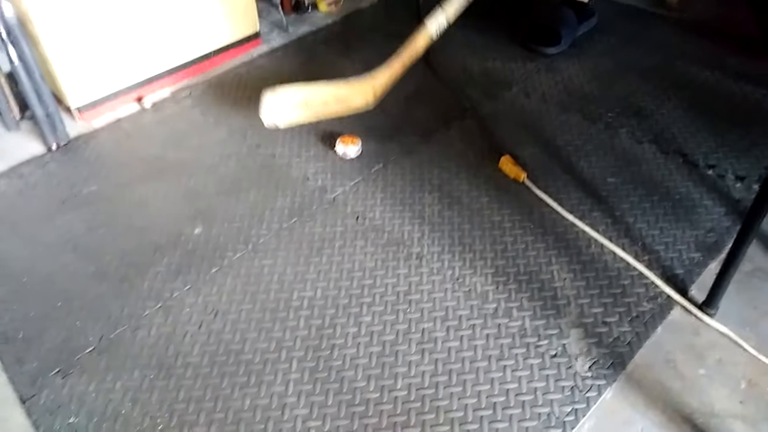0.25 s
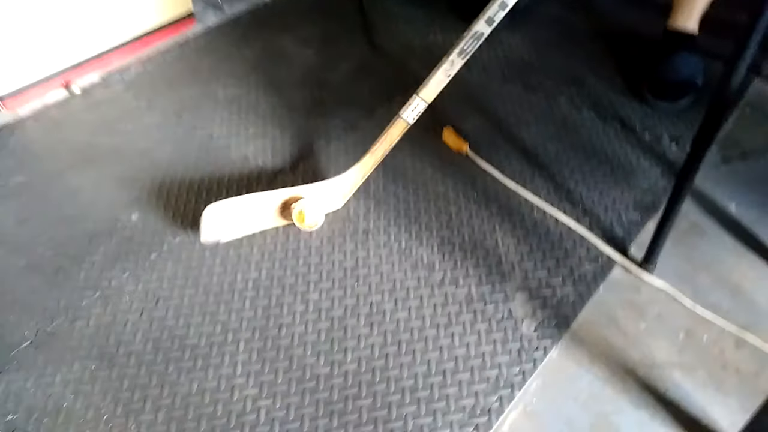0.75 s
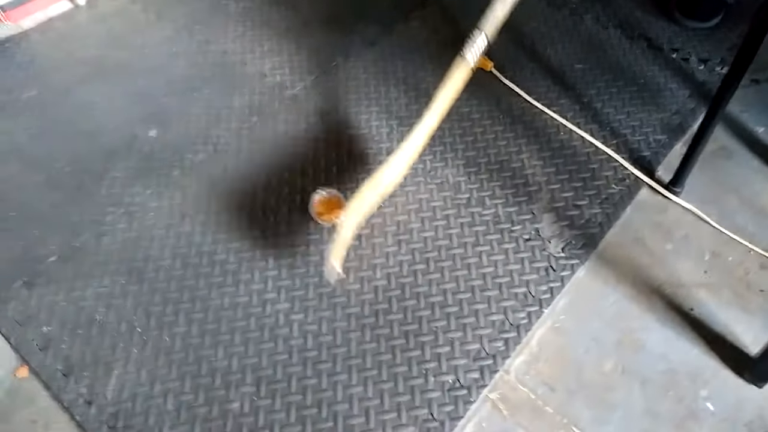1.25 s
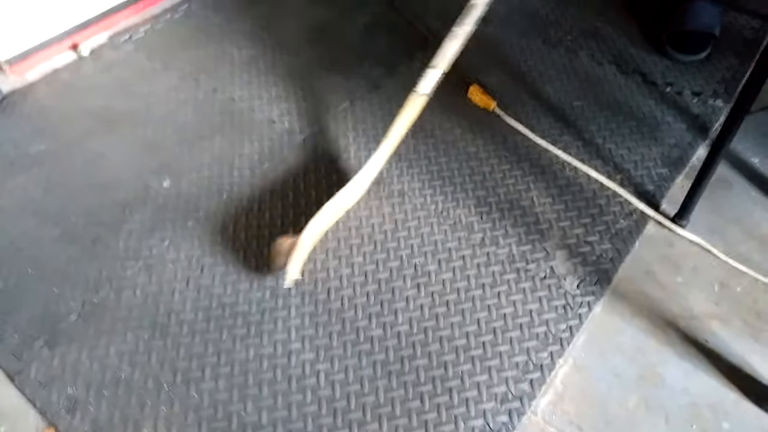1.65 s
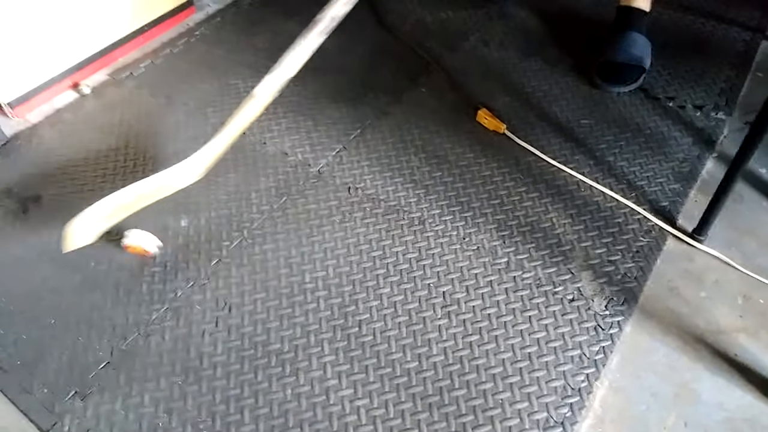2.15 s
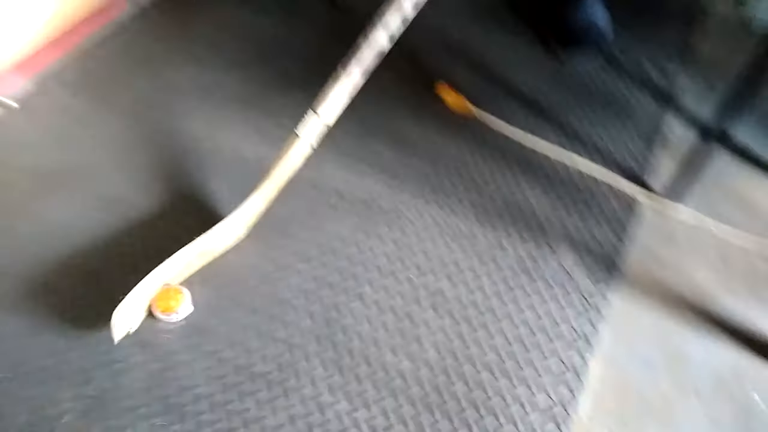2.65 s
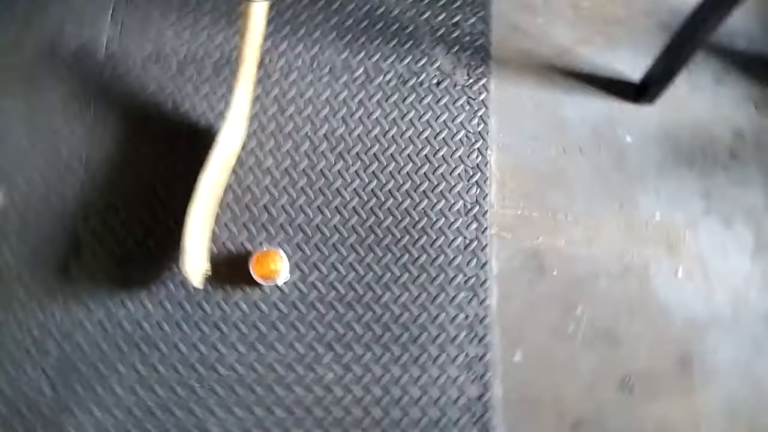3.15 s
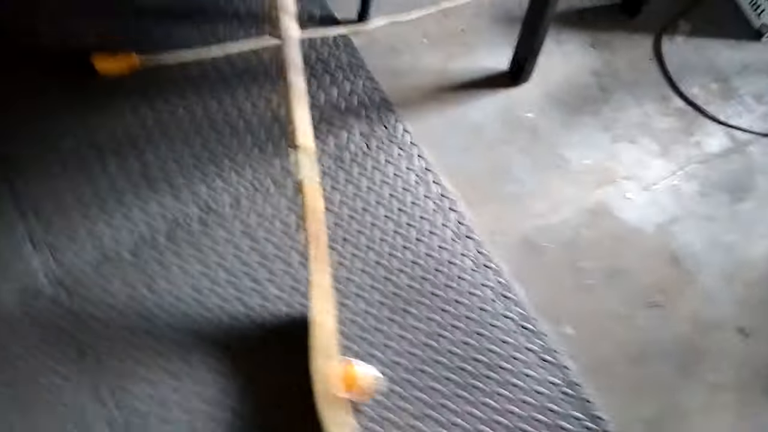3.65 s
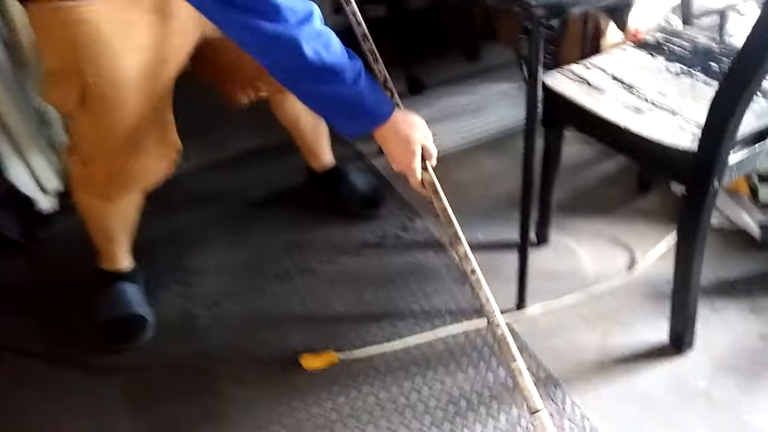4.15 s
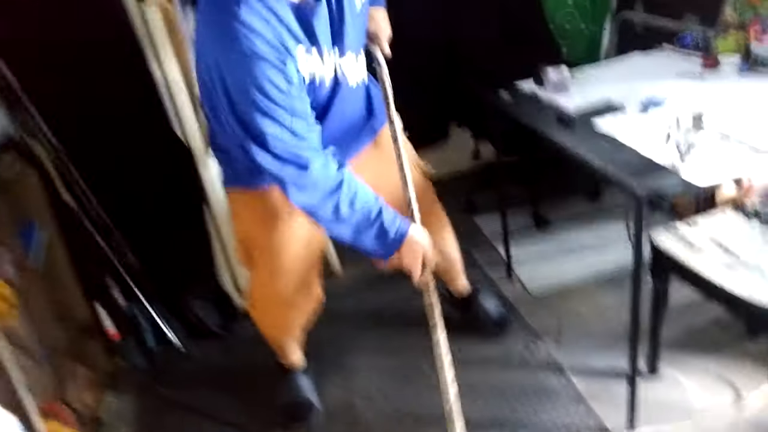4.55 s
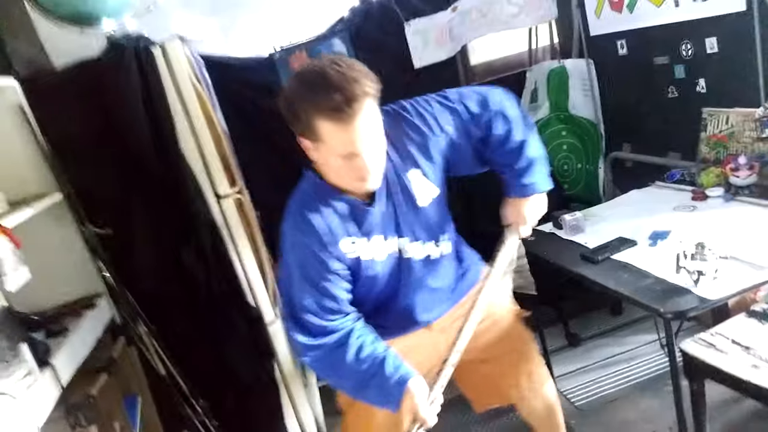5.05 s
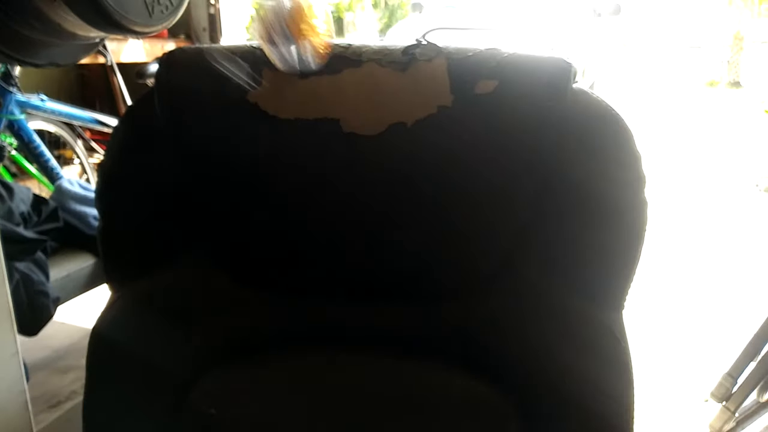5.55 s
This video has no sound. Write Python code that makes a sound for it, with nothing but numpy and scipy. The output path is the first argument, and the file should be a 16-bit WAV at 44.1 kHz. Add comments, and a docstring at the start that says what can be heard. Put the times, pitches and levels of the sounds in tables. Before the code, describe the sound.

A wooden hockey stick clacks a hard ball and scrapes over a rubber mat in a garage, then a shot crashes loudly into clutter.

```python
"""A wooden hockey stick taps a hard ball to and fro on a rubber mat in a garage: the wood clacks and
the ball rings on. Between taps the blade knocks on the mat, rasps over the tread and judders.
The player steps up with soft footfalls and shoots; stick and ball crash into stored clutter, loud
enough to drive the recorder's limiter. Short garage reflections and faint room tone surround it all."""
import sys
import numpy as np
from scipy import signal
from scipy.io import wavfile
from scipy.ndimage import uniform_filter1d, minimum_filter1d

SR = 44100
rng = np.random.default_rng(int(sys.argv[2]) if len(sys.argv) > 2 else 0)


def put_to_file(sound):
    """Save the sound as 16-bit audio at rate SR, in the file named by the first command-line argument."""
    columns = np.atleast_2d(sound).T  # one column per channel
    safe = np.clip(columns, -1, 1)
    whole_steps = np.round(safe * 32767)
    wavfile.write(sys.argv[1], SR, whole_steps.astype(np.int16))


N = 255780
TIME = np.arange(N) / SR
BODY_TOP_HZ, CLACK_TOP_HZ = 800, 3400   # crossovers of a blow: low body, mid clack, high crack

# broad resonances of the wooden stick: (frequency [Hz], width [Hz], level [dB])
STICK_MODES = [(394, 31, -34.5), (675, 126, -19), (880, 150, -3), (1072, 65, -0.5), (1460, 52, -18),
               (1490, 143, 0), (1850, 260, 0.5), (2050, 170, -2.5), (2400, 500, 4.5), (2875, 290, 3.5),
               (3130, 86, -1.5), (3970, 460, 3), (4470, 173, 3.5), (5200, 3000, -29), (5620, 2400, 5),
               (7700, 1700, -0.5), (7600, 1200, -63), (8800, 3600, -3)]


def from_db(db):
    """Decibels to gain."""
    return 10 ** (np.asarray(db) / 20)


def rms_one(x):
    """Scale to rms 1."""
    return x / np.sqrt(np.mean(x ** 2) + 1e-20)


def unit_energy(x):
    """Scale to a sum of squares of 1."""
    return x / np.sqrt(np.sum(x ** 2) + 1e-20)


def in_time(curve):
    """Read a breakpoint curve at every sample."""
    return np.interp(TIME, *np.transpose(curve))


def at_hz(spectrum, hz):
    """Read an EQ curve on a log-frequency axis."""
    points_hz, db = np.transpose(spectrum)
    return np.interp(np.log(hz), np.log(points_hz), db)


def cut(x, hz, kind, order=2):
    """Butterworth filter."""
    return signal.sosfilt(signal.butter(order, np.minimum(hz, .48 * SR), kind, fs=SR, output="sos"), x)


def bands(sources):
    """Yield third-octave bands (centre [Hz], signal); neighbours take turns on two sources."""
    edges = 100 * 2 ** (np.arange(23) / 3)
    for k, (lo, hi) in enumerate(zip(edges, edges[1:])):
        yield np.sqrt(lo * hi), cut(sources[k % 2], [lo, hi], "band")


def drift(knots_per_s):
    """Random modulation that glides between values of spread 1."""
    knots = rng.standard_normal(600)
    return np.interp(TIME * knots_per_s, np.arange(len(knots)), knots)


def add(track, s, sound):
    """Mix a sound in at a time."""
    i = int(np.clip(round(s * SR), 0, len(track) - 1))
    track[i:i + len(sound)] += sound[:len(track) - i]


def garage(x, wet_db, t60_s=0.26, treble_t60_s=0.18):
    """Dense reflections build up fast and die away; each spot in the room has its own pattern."""
    t = TIME[:SR // 3]
    noise = rng.standard_normal(len(t))
    dull = cut(noise, 6900, "low", order=1)
    tail = dull * from_db(-60 * t / t60_s) + (noise - dull) * from_db(-60 * t / treble_t60_s)
    build_up = 1 - np.exp(-t / 0.00011)
    response = from_db(wet_db) * unit_energy(tail * build_up)
    response[0] += 1   # direct sound
    return signal.fftconvolve(x, response)[:N]


def blow(modes, levels_db, clack_hz, scatter_db, focus_db):
    """A contact rings all modes: hardness sets body, clack and crack; its place favours one pitch."""
    hz, width, db = np.transpose(modes)
    group = np.searchsorted([BODY_TOP_HZ, CLACK_TOP_HZ], hz)
    off_pitch_db = focus_db * (group == 1) * np.abs(np.log2(hz / clack_hz))
    gain = from_db(db - off_pitch_db + scatter_db * rng.standard_normal(len(hz)))
    t = TIME[:SR // 20, None]
    decay = np.sqrt(width) * np.exp(-np.pi * width * t)
    rings = gain * decay * np.sin(2 * np.pi * (hz * t + rng.random(len(hz))))
    body, clack, crack = (rings[:, group == k].sum(axis=1) for k in range(3))
    # each group radiates only around its own range
    parts = [cut(body, [200, 1100], "band"),
             cut(clack, [.5 * clack_hz, 1.74 * clack_hz], "band"),
             cut(crack, [3600, 15000], "band")]
    hit = sum(from_db(db) * unit_energy(part) for db, part in zip(levels_db, parts))
    return np.sqrt(0.0086 * SR) * hit   # levels are rms, as if spread over 8.6 ms


def room_tone():
    """Faint air in the garage, rising at the start."""
    # colour of the air: (frequency [Hz], level [dB])
    air_eq = [(59, -51), (100, -13.5), (322, 3), (1420, -2.5), (1950, -5), (4570, -7), (5530, -6.5),
              (6560, -3), (7450, -15), (12700, -11.5), (16000, -4)]
    # its fader curve: (time [s], level [dB])
    fader = [(0, -69.5), (.3, -61), (5.8, -56.5)]
    tone = sum(band * from_db(at_hz(air_eq, hz)) for hz, band in bands(rng.standard_normal((2, N))))
    return from_db(in_time(fader)) * rms_one(tone)


def footsteps(trim_db=-0.5, crack_db=-19):
    """Shoes land on the mat: soft, dull blows, heard mostly through the room."""
    # footfalls: (time [s], level [dB], body [dB re level])
    steps = [(3.8295, -41, -17), (4.19, -43, -4.5), (4.206, -48, -17), (4.7882, -55, -7), (4.8168, -44, -7),
             (5.013, -42.5, 4.5), (5.3145, -51, -15)]
    # resonances of a shoe: (frequency [Hz], width [Hz], level [dB])
    shoe_modes = [(181, 93, -32), (311, 40, 1.5), (567, 113, 14), (740, 210, -3), (994, 240, -1),
                  (1500, 190, 0), (2300, 1350, 3.5), (4470, 580, 6), (6600, 1100, -9)]
    out = np.zeros(N)
    for s, db, body in steps:
        step = blow(shoe_modes, [db + body, db, db + crack_db], clack_hz=920, scatter_db=1.5, focus_db=1.5)
        add(out, s, garage(step, wet_db=6.0))
    return from_db(trim_db) * out


def thumps(push_s=0.0019):
    """A faint low thump, as of the recorder overloading, under a few of the loud blows."""
    # short, rounded pulses: (time [s], peak [dB])
    pulses = [(0.4829, -34.5), (0.7337, -28), (2.329, -37), (3.6662, -22.5), (5.495, -18)]
    out = np.zeros(N)
    for s, db in pulses:
        add(out, s, from_db(db) * np.hanning(int(push_s * SR)))
    return out


def blade_judder(width_hz=400, trim_db=5.0):
    """Uneven slips on the rubber drive one resonance of the blade for a moment."""
    # judders: (start [s], end [s], pitch [Hz], level [dB])
    judders = [(0.587, 0.6, 1380, -33.5), (0.619, 0.673, 1400, -44), (1.654, 1.694, 1660, -40),
               (2.797, 2.844, 2390, -45), (2.92, 2.957, 2580, -44.5), (3.561, 3.65, 2680, -44.5)]
    out = np.zeros(N)
    for start, end, hz, db in judders:
        slips = rng.standard_normal(int((end - start) * SR))
        rub = rms_one(cut(slips, [hz - width_hz / 2, hz + width_hz / 2], "band"))
        add(out, start, from_db(trim_db + db) * rub * signal.windows.tukey(len(rub), .4))
    return garage(out, wet_db=-1.5)


def stroke_gains(bite_s=0.018, lift_t60_s=0.24):
    """Envelopes of rasp and hiss: in each stroke the blade bites, swells or eases, and lifts."""
    # strokes over the tread: (start [s], length [s], level [dB], swell [dB], hiss [dB re rasp])
    strokes = [(0.23, 0.03, -57, 7, 1), (0.328, 0.08, -49, -7, 3.5), (0.406, 0.18, -35.5, 1, 1.5),
               (0.638, 0.16, -37, -1.5, 5.5), (1.053, .07, -64, 0, 1), (1.324, 0.09, -45, 9, -2),
               (1.419, 0.21, -42, 9, 4), (1.648, 0.087, -40, -8.5, 6), (1.909, 0.3, -51.5, 4, -2),
               (2.148, 0.067, -44, 1.5, 0), (2.262, 0.48, -44.5, 3, 2), (2.772, 0.25, -43, -0.5, 3.5),
               (3.061, 0.042, -48.5, -2, 2.5), (3.154, 0.033, -53.5, 5, 2.5), (3.441, 0.042, -40, 8.5, 0),
               (3.523, 0.12, -40, -2.5, 3.5), (3.796, 0.21, -43, -6.5, -3.5), (4.058, .035, -43, -1, -7),
               (4.156, 0.015, -35, 4, -1.5), (4.241, 0.24, -35.5, 1.5, -0.5), (4.69, 0.027, -51.5, 2, 2.5),
               (4.849, 0.15, -53, 12, -1), (5.001, 0.22, -40, -6, -4)]
    rasp_power, hiss_power = np.zeros((2, N))
    for start, length, db, swell_db, hiss_db in strokes:
        t = TIME[:int((length + lift_t60_s) * SR)]
        ramp_db = swell_db * (np.minimum(t / length, 1) - .5)
        release_db = -60 * np.maximum(t - length, 0) / lift_t60_s
        gain = np.minimum(t / bite_s, 1) * from_db(db + ramp_db + release_db)
        add(rasp_power, start, gain ** 2)
        add(hiss_power, start, (gain * from_db(hiss_db)) ** 2)
    return np.sqrt(rasp_power), np.sqrt(hiss_power)


def blade_drag(grains_per_s=8000, grain_db=1.0, flutter_db=2.83, shimmer_db=1.9, trim_db=-2.0):
    """The blade's edge catches and slips on the rubber ribs: tiny clicks merge into rasp and hiss."""
    # colour of the tread: (frequency [Hz], level [dB])
    tread_eq = [(120, -56), (200, -64), (387, -23), (579, -12), (696, -7.5), (851, -5.5), (1530, -0.5),
                (1840, 0.5), (2610, -0.5), (3430, -1.5), (4680, -2.5), (7680, -12.5), (9400, -18),
                (11500, -29), (16000, -31)]
    # tilt of the hiss, duller late in the drill: (time [s], slope [dB/octave])
    sheen = [(0.4, 11), (1.5, 9), (2.6, 11), (3.5, 5), (5.1, 7.5)]
    sizes = from_db(grain_db * np.minimum(rng.exponential(1, N), 5))
    catches = rng.random(N) < grains_per_s / SR
    slips = sizes * catches * rng.standard_normal((2, N)) * from_db(flutter_db * drift(70))
    parts = [(hz, band * from_db(at_hz(tread_eq, hz) + shimmer_db * drift(12)))
             for hz, band in bands(slips)]
    slope = in_time(sheen)
    rasp = sum(band for hz, band in parts if hz < CLACK_TOP_HZ)
    hiss = sum(band * from_db(slope * np.log2(hz / 5500)) for hz, band in parts if hz >= CLACK_TOP_HZ)
    rasp_gain, hiss_gain = stroke_gains()
    drag = rms_one(rasp) * rasp_gain + rms_one(hiss) * hiss_gain
    return garage(from_db(trim_db) * drag, wet_db=-8.5)


def rattles(start_s=5.435, gap_s=0.012, count=30, centre_hz=1700, spread_octaves=0.87, scatter_db=2.5):
    """Small things rattle at random through the crash; yields (time [s], levels [dB], pitch [Hz])."""
    levels_db = np.array([-51, -31.5, -29])   # body, clack, crack
    for k, (late, size, pitch) in enumerate(rng.uniform(-1, 1, (count, 3))):
        s = start_s + gap_s * (k + late / 2)
        yield s, levels_db + scatter_db * size, centre_hz * 2 ** (spread_octaves * pitch)


def volleys(gap_s=0.011, gap_spread=0.15, crack_loss_db=5.5):
    """Heavy blows at uneven gaps, losing crack as they go; yields (time [s], levels [dB], pitch [Hz])."""
    # the shot and the things it knocks over:
    # (time [s], blows [count], level [dB], body [dB re level], crack [dB re level], clack pitch [Hz])
    impacts = [(5.3824, 1, -10, -26.5, -9, 2200), (5.398, 3, -16.5, -22.5, 0.5, 2530),
               (5.43, 1, -18, -20, 8, 2640), (5.468, 2, -10.5, -19.5, 3, 2300),
               (5.494, 3, -15.5, -19.5, 5, 2050), (5.571, 3, -11, -10.5, -1.5, 1670),
               (5.638, 4, -17.5, -9.5, 12, 1710), (5.691, 2, -14.5, -12.5, -4, 1390),
               (5.724, 2, -14, -5.5, -3, 1740), (5.75, 1, -20, -20, 3, 1700)]
    for s, blows, db, body, crack, clack_hz in impacts:
        for k in range(blows):
            yield s, [db + body, db, db + crack - crack_loss_db * k], clack_hz
            s += gap_s * (1 + gap_spread * rng.uniform(-1, 1))


def crash(trim_db=-3.5, bounce_db=-9.0, bounce_s=.003, bounces=4):
    """Loose things are knocked together; each blow chatters on in a few quick, weaker bounces."""
    # resonances of the stored clutter: (frequency [Hz], width [Hz], level [dB])
    clutter_modes = [(260, 55, -14), (360.5, 27, 0), (510, 76, -2), (636, 140, 4), (822, 124, 2),
                     (1220, 490, 2), (1700, 290, 1), (1980, 360, 0.5), (2340, 580, -0.5), (2630, 180, 0.5),
                     (3060, 200, 1.5), (3380, 220, -2), (4150, 450, 1.5), (4720, 510, 2.5),
                     (5520, 410, -0.5), (6400, 690, 0), (8180, 1200, -4), (12000, 18000, -8.5)]
    out = np.zeros(N)
    for s, levels, clack_hz in [*volleys(), *rattles()]:
        hit = blow(clutter_modes, levels, clack_hz, scatter_db=1.5, focus_db=3.5)
        gaps = bounce_s * rng.uniform(.3, 1.7, bounces)
        chatter = np.zeros(SR // 4)
        for k, delay in enumerate([0, *np.cumsum(gaps)]):
            add(chatter, delay, from_db(bounce_db * k) * hit)
        add(out, s, garage(chatter, wet_db=2.0))
    return from_db(trim_db) * out


def soften_stick(x, s, top_hz=14300, fall_octaves_per_s=0.22):
    """Roll off a blow's treble: the blows sound duller as the drill goes on."""
    return cut(x, top_hz * 2 ** (-fall_octaves_per_s * s), "low", order=4)


def stick_on_mat(trim_db=-2.0, body_db=-17, damping_hz=215):
    """The blade comes down on the mat: wood cushioned by rubber, a full, dull knock with no ring."""
    # knocks: (time [s], level [dB], clack pitch [Hz], crack [dB re level])
    knocks = [(0.3341, -37.5, 1500, -10), (0.4846, -21.5, 940, -23), (0.8863, -37, 1730, -30),
              (0.9958, -49, 1700, -29), (1.3209, -47, 1630, -22), (2.4175, -29.5, 1480, -7),
              (2.5148, -30.5, 1200, -5.5), (2.6627, -28.5, 1400, -5.5), (2.8336, -27.5, 1500, -21),
              (2.898, -33, 1500, -4), (3.29, -36, 1350, -9), (3.3041, -22.5, 1010, -13.5),
              (3.6725, -20, 1700, -22), (4.3697, -24, 1680, -6)]
    damped_modes = np.add(STICK_MODES, [0, damping_hz, 0])   # the rubber widens each resonance
    out = np.zeros(N)
    for s, db, clack_hz, crack in knocks:
        knock = blow(damped_modes, [db + body_db, db, db + crack], clack_hz, scatter_db=2.0, focus_db=10.5)
        add(out, s, garage(soften_stick(knock, s), wet_db=2.0))
    return from_db(trim_db) * out


def ball_ring(ring_hz, focus_db=36, reach_octaves=.3, scatter_db=1.5):
    """The ball's modes ring on; the spot that is struck favours those near one pitch."""
    # modes of the hard ball: (frequency [Hz], level [dB], t60 [s])
    ball_modes = [(1653, -1, .15), (1825, -3, .19), (1981, -5, .17), (2713, -16, .25), (4581, -7, .12),
                  (4780, 4, .19), (5610, 2, .2), (6008, 5, .17), (7144, -7, .14), (7900, -7, .15)]
    hz, db, t60 = np.transpose(ball_modes)
    t = TIME[:SR // 4, None]
    detuning = np.minimum(np.abs(np.log2(hz / ring_hz)), reach_octaves)
    strength = from_db(db - focus_db * detuning + scatter_db * rng.standard_normal(len(hz)))
    polarity = rng.choice([-1, 1], len(hz))
    rings = from_db(-60 * t / t60) * np.sin(2 * np.pi * hz * t)
    return rings @ (strength * polarity)


def stick_on_ball(clack_trim_db=-2.5, crack_db=-0.5):
    """Each tap is a short, sharp wooden clack, and the ball rings on after it; one such click also sharpens the
    foot stomp at 5.01 s."""
    # taps: (time [s], level [dB], body [dB re level], clack pitch [Hz], ball ring [dB re level], ring pitch
    # [Hz]); the last row is the sharp contact of a stomping foot
    taps = [(0.4821, -14, -12.5, 2100, -15.5, 5700), (0.7328, -18, -24, 1950, -32, 5160),
            (0.7479, -24, -33, 2380, -5, 5430), (0.8902, -31, -32, 1800, -6.5, 5100),
            (1.153, -41, -34, 1700, -7.5, 4700), (1.2116, -49.5, -27, 2050, -6, 4780),
            (1.3536, -45, -33, 2480, -27, 4780), (1.4178, -15.5, -30, 1620, -16, 4660),
            (1.458, -25, -21, 2400, -17, 4660), (1.5708, -35, -35, 2300, -8, 4550),
            (1.6102, -28, -37, 2200, -7, 4450), (1.6569, -30.5, -37, 1970, -9, 4780),
            (1.7884, -34, -21, 1790, -17, 4780), (2.0247, -37.5, -25, 1740, -2, 4660),
            (2.3274, -13, -36, 1390, -10, 6000), (2.4027, -28.5, -34, 1600, -4, 6000),
            (3.4404, -41, -37, 1620, -28, 4780), (3.6666, -13, -33, 2400, -15, 4510),
            (4.1606, -39.5, -10, 1650, -18, 4780), (4.5827, -43.5, -35, 1940, -11, 4780),
            (5.012, -39.5, -4, 1750, -20, 4780)]
    out = np.zeros(N)
    for s, db, body, clack_hz, ring, ring_hz in taps:
        tap = blow(STICK_MODES, [db + body, db, db + crack_db], clack_hz, scatter_db=2.5, focus_db=13.0)
        add(out, s, from_db(clack_trim_db) * garage(soften_stick(tap, s), wet_db=0.0))
        add(out, s, from_db(db + ring) * garage(ball_ring(ring_hz), wet_db=-12.0))
    return out


def scene():
    """A mono mix with little bass, apart from a few faint low thumps."""
    stickhandling = stick_on_ball() + stick_on_mat() + blade_drag() + blade_judder()
    mix = stickhandling + footsteps() + crash() + room_tone()
    return (cut(mix, 180, "high", order=4) + thumps())[None]


def limiter(x, ceiling=.7, release_db_per_s=5000):
    """The gain drops at once on a peak over the ceiling and comes back within milliseconds."""
    over_db = 20 * np.log10(np.maximum(np.abs(x) / ceiling, 1))
    release_db = release_db_per_s * TIME
    reduction_db = np.maximum.accumulate(over_db + release_db, axis=-1) - release_db
    held_gain = minimum_filter1d(from_db(-reduction_db), size=15)
    return x * uniform_filter1d(held_gain, size=15)


def record(dry, mic_top_hz=8750, band_limit_hz=16100):
    """A small microphone with a soft top, a limiter, and a steep band limit."""
    limited = limiter(cut(dry, mic_top_hz, "low"))
    return signal.sosfilt(signal.ellip(10, .1, 80, band_limit_hz, fs=SR, output="sos"), limited)


dry = scene()
out = record(dry)
put_to_file(out)
```